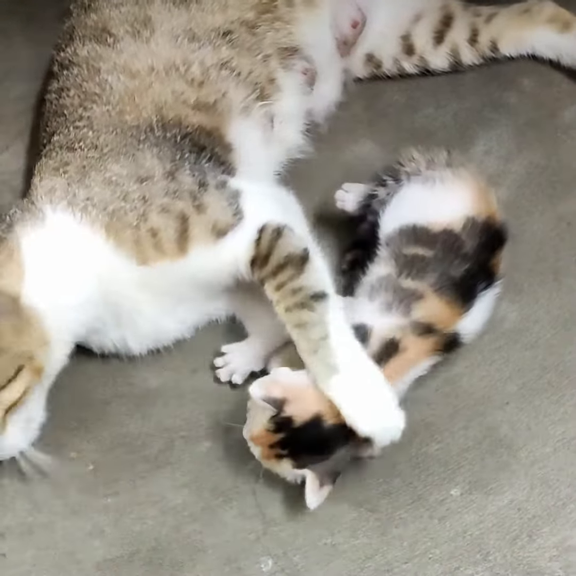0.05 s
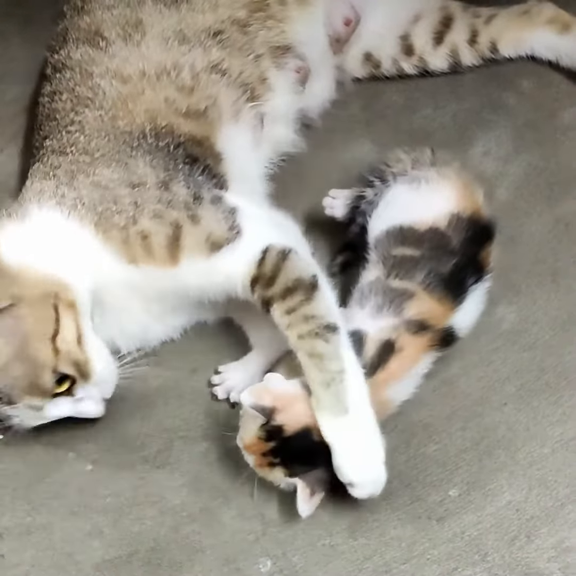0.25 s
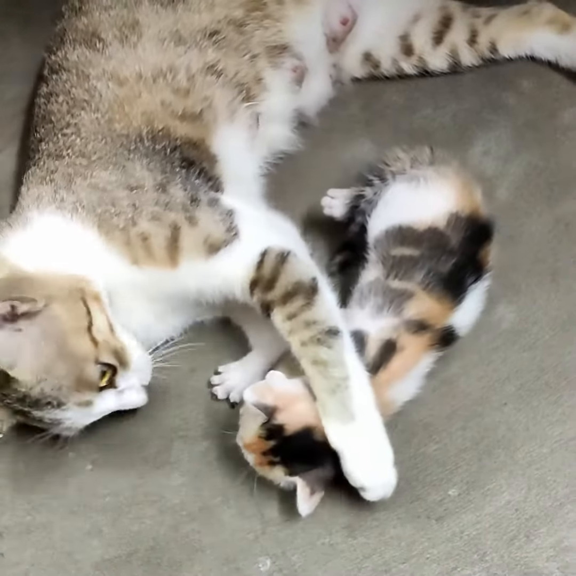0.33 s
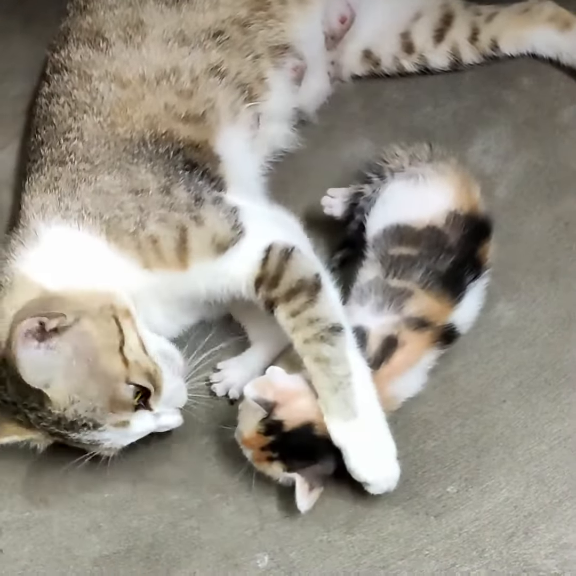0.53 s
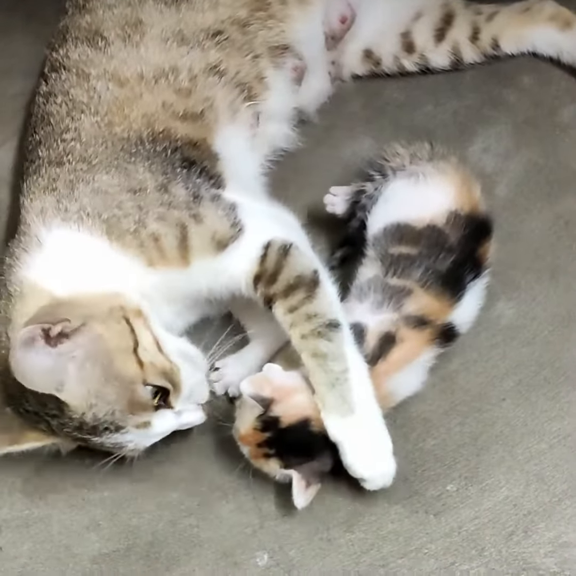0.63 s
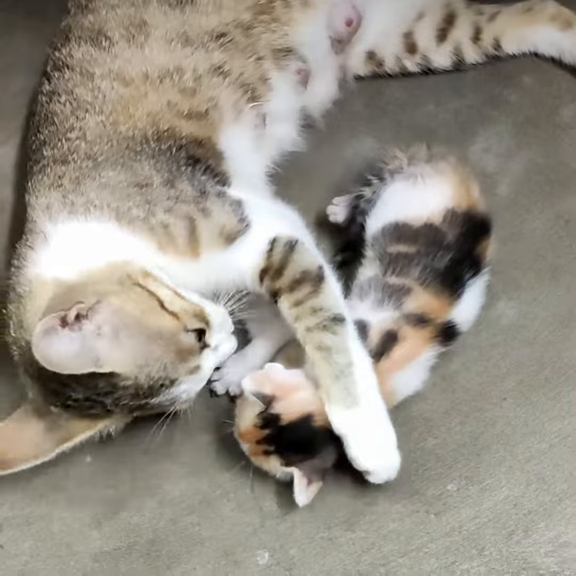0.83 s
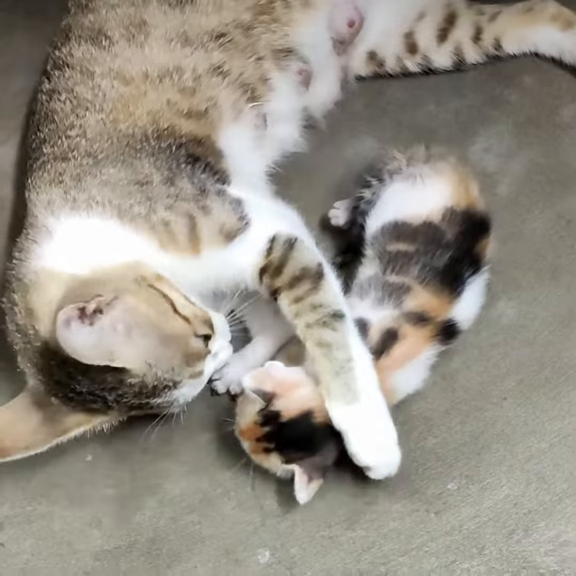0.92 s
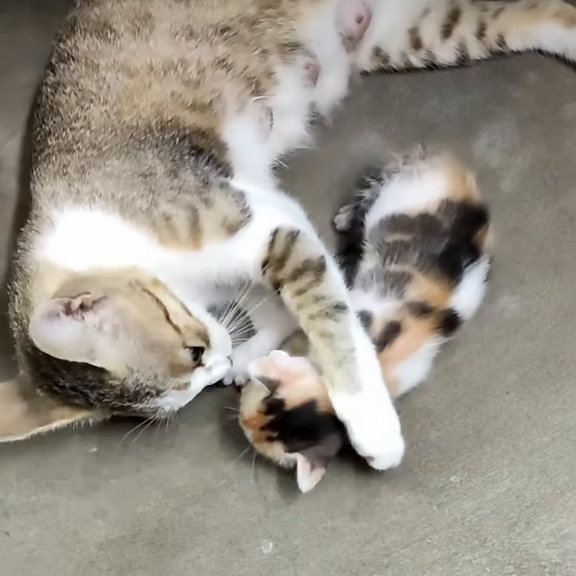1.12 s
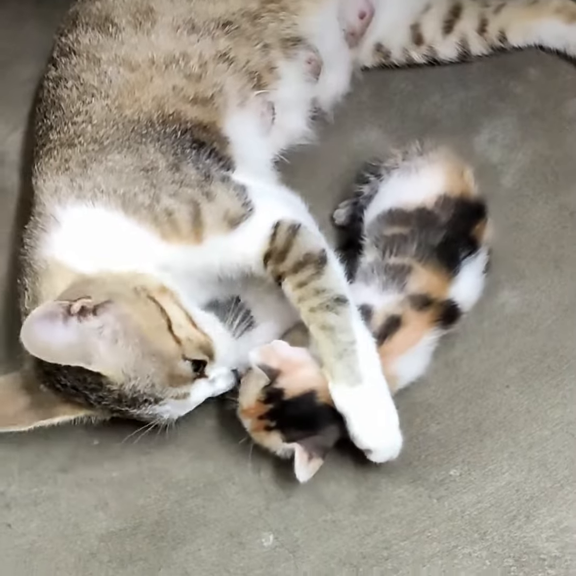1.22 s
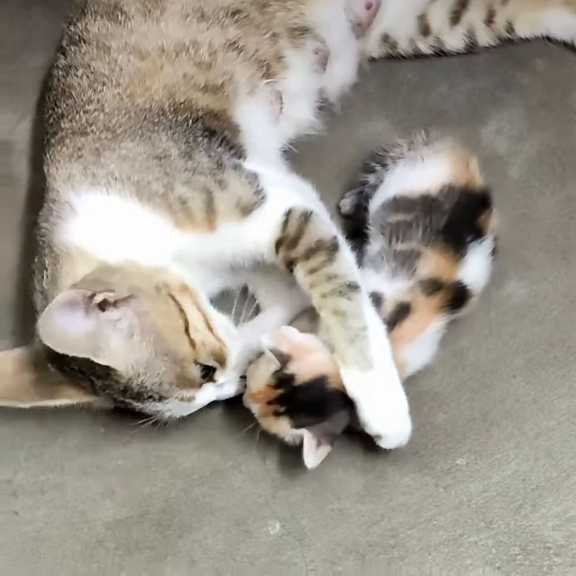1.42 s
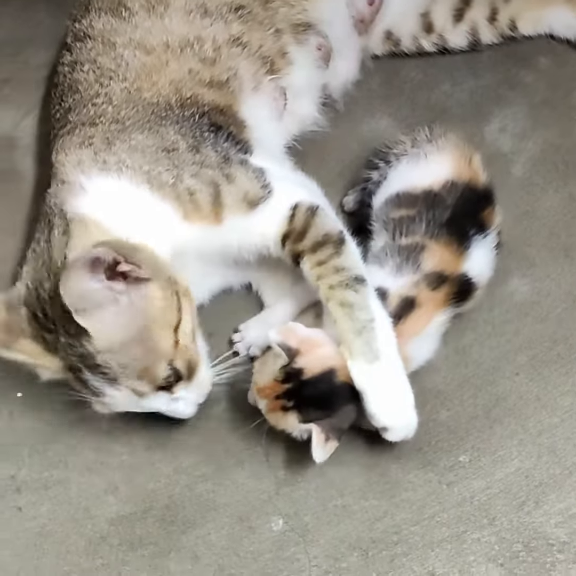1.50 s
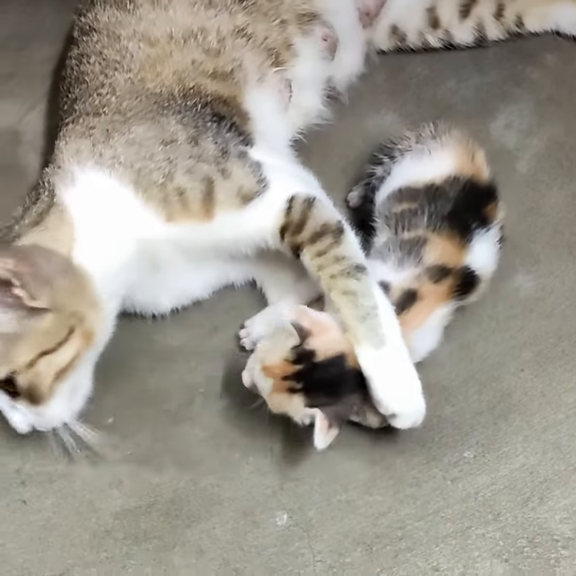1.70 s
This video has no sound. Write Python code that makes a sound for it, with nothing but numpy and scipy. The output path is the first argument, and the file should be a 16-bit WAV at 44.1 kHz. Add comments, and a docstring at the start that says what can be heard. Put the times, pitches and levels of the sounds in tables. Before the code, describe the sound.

One short cat meow starts as a fluttering closed-mouth trill, flares open, and falls away.

```python
"""A mother cat gives one trilled meow close to a phone: a closed-mouth trill, a clear hum, then the lips part,
the call flares bright and sinks again. She is a stack of partials, cut by throat flaps, with pulsing breath noise.
Her kitten mews faintly under the trill on four partials; a smack and one soft scuff are bursts of coloured noise.
A hard-walled shelter answers with a decaying noise tail; steady air noise and two low drones fill the quiet."""
import sys
import numpy as np
from scipy import signal
from scipy.fft import rfft, irfft, next_fast_len
from scipy.io import wavfile
from scipy.ndimage import uniform_filter1d, map_coordinates

SR = 44100
rng = np.random.default_rng(int(sys.argv[2]) if len(sys.argv) > 2 else 0)


def to_wav(s):
    """Save 16-bit WAV."""
    ch = np.atleast_2d(s).T  # columns
    pcm = np.round(np.clip(ch, -1, 1) * 32767)  # PCM
    wavfile.write(sys.argv[1], SR, pcm.astype(np.int16))


N = 77175
T = np.arange(N) / SR  # s


def amp(db):
    """dB to gain."""
    return 10 ** (np.asarray(db) / 20)


def unit(x):
    """Scale to rms 1."""
    return x / np.sqrt(np.mean(x ** 2) + 1e-20)


def along(points, hz):
    """Read a (Hz, value) curve on a log frequency axis."""
    f, v = np.transpose(points)
    return np.interp(np.log(hz + 1), np.log(f + 1), v)


def curves(rows):
    """Draw one automation curve, a value per sample, for each column after the time."""
    s, *columns = np.transpose(rows)
    return [np.interp(T, s, column) for column in columns]


def wobble(rate):
    """A smooth random curve, rate knots a second."""
    knots = rng.standard_normal(int(N * rate / SR) + 4)
    return map_coordinates(knots, [T * rate])


def filtered(x, response):
    """Filter x by a complex response of frequency."""
    m = next_fast_len(N + SR // 2)
    hz = np.fft.rfftfreq(m, 1 / SR)
    return irfft(rfft(x, m) * response(hz), m)[..., :N]


def hiss(tone):
    """Noise coloured by a (Hz, dB) curve, at rms 1."""
    return unit(filtered(rng.standard_normal(N), lambda hz: amp(along(tone, hz))))


def step(t, width):
    """A soft switch from 0 to 1 around t = 0."""
    return .5 + .5 * np.tanh(t / width / 2)


# throat flaps of the trill: t/s, depth (0-1), length/s
THROAT_FLAPS = [(.122, .9, .011), (.143, .7, .006), (.157, .8, .009), (.181, 1, .024), (.224, 1, .018),
                (.252, 1, .015), (.278, .7, .011), (.299, 1, .017), (.325, 1, .015), (.350, 1, .014),
                (.374, .4, .006), (.813, .8, .005), (.826, 1, .01)]
CLOSE_S, OPEN_S = .001, .001  # softness of each flap's edges
RETUNE = 1.15  # the pitch is back after this many flap lengths


def throat_flaps():
    """Each flap shuts for its length; the slack it leaves jumps up, then fades in a straight line."""
    shut, slack = 0, 0
    for s, depth, length in THROAT_FLAPS:
        closing = depth * step(T - s, CLOSE_S)
        shut = shut + closing * step(s + length - T, OPEN_S)
        slack = slack + closing * np.clip(1 - (T - s) / (RETUNE * length), 0, 1)
    return shut, slack


# partials before flaps and shimmer: t/s, fundamental level/dB, second partial level/dB,
# overtones through the nose level/dB, overtones through the open mouth level/dB
CALL_LEVELS = [(.085, -80, -64.5, -71, -90), (.105, -43, -56, -62.5, -90), (.14, -48, -49.5, -53.5, -90),
               (.17, -45.5, -47, -50.5, -88), (.2, -45.5, -43.5, -51, -93),
               (.218, -39.5, -42, -44.5, -93.5), (.247, -48, -38, -47.5, -92),
               (.272, -43, -43.5, -42.5, -84.5), (.295, -44.5, -39, -43.5, -87),
               (.32, -42.5, -36.5, -46, -88.5), (.347, -45, -35, -47.5, -91),
               (.368, -43, -34.5, -48.5, -96.5), (0.38, -41.5, -34.5, -42.5, -71),
               (0.402, -39.5, -28.5, -53, -63.5), (0.464, -35.5, -29.5, -46.5, -53),
               (0.478, -52, -27, -48, -54), (0.496, -46, -39.5, -63.5, -60), (0.51, -50, -47.5, -55.5, -86),
               (0.52, -45, -49, -61.5, -47.5), (0.538, -57.5, -51, -49.5, -53),
               (0.556, -46, -52.5, -40.5, -43.5), (0.576, -43, -30, -46, -23),
               (0.592, -42, -35.5, -50, -21.5), (0.602, -47, -33.5, -57, -35),
               (0.614, -45, -40.5, -38.5, -32.5), (0.634, -57, -42, -48.5, -51),
               (0.646, -49, -61.5, -49, -50), (0.662, -40.5, -38.5, -50, -46.5),
               (0.672, -43.5, -39, -50, -61), (0.724, -40.5, -36.5, -57, -56),
               (0.756, -41.5, -38.5, -62, -63.5), (0.782, -44.5, -45.5, -74, -78),
               (0.788, -48, -39.5, -62, -73.5), (0.808, -40, -51, -56, -76),
               (0.818, -42.5, -44.5, -57, -83), (0.83, -49, -48.5, -65, -70), (.838, -68, -57, -71, -95),
               (.858, -63.5, -57, -67, -84), (.87, -52, -66, -73, -83), (.88, -63, -72, -75, -90.5)]
# colour of the overtones through the nose: f/Hz, level/dB
NOSE_TONE = [(1000, 17), (1350, -6), (1800, -0.5), (2150, -12.5), (2600, -27), (3200, -22.5), (4400, -20.5),
             (5000, -24), (6000, -48), (9000, -71.5)]
# colour of the overtones through the open mouth: f/Hz, level/dB
MOUTH_TONE = [(1500, -27.5), (1830, -18.5), (2400, -8), (3060, -7), (3700, -11), (4300, -20.5), (5000, -39),
              (6100, -38.5), (6900, -35), (7600, -45.5), (8600, -57), (12000, -78)]
FLAP_CUT_DB, FLAP_UPPER_CUT_DB = 13, 16  # cut on the fundamental, on the partials above
SHIMMER_DB = .5  # random level wobble of the fundamental, wider for higher partials


def voice(hz, phase, shut, slack):
    """Fifteen partials: two set directly, the rest coloured by nose and mouth as they slide in pitch."""
    first_db, second_db, nose_db, mouth_db = curves(CALL_LEVELS)
    upper_cut = amp(-FLAP_UPPER_CUT_DB * shut)
    gains = [amp(first_db - FLAP_CUT_DB * slack ** 2), amp(second_db) * upper_cut]
    for k in range(3, 16):
        nose = amp(nose_db + along(NOSE_TONE, k * hz))
        mouth = amp(mouth_db + along(MOUTH_TONE, k * hz))
        gains.append(upper_cut * np.hypot(nose, mouth))
    partials = 0
    for k, gain in enumerate(gains, 1):
        shimmer = amp(SHIMMER_DB * np.sqrt(k) * wobble(70))
        # the lowest two partials stay in step; the others start anywhere
        start = np.clip(k - 2, 0, 1) * rng.uniform(0, 2 * np.pi)
        partials = partials - np.sqrt(2) * gain * shimmer * np.cos(k * phase + start)
    return partials


# colour of the breath under the voice: f/Hz, level/dB
BREATH_TONE = [(250, -31.5), (420, -16.5), (600, -19.5), (950, -1.5), (1250, -6.5), (1850, -12.5),
               (2300, -29.5), (4500, -20), (6000, -56.5), (9000, -60)]
# rasp of air in the open mouth, before it pulses: t/s, level/dB
RASP_LEVEL = [(.515, -85), (.527, -57), (.56, -61), (.585, -56), (.615, -52), (.65, -58), (.7, -63),
              (.77, -76)]
# colour of the rasp: f/Hz, level/dB
RASP_COLOUR = [(1200, -22), (2200, -9.5), (3000, -4), (3700, -7.5), (4400, -10.5), (5200, -10),
               (6000, -18.5), (7100, -8), (7700, -22), (9000, -40)]
BREATH_DB, TRILL_BREATH_DB, TRILL_END_S = -26, -14.5, .38  # breath levels relative to the lowest two partials


def breath_and_rasp(phase):
    """Air noise follows the voice level, rasp its own curve; both swell and thin with every voice cycle."""
    first_db, second_db, _, _ = curves(CALL_LEVELS)
    rasp_db, = curves(RASP_LEVEL)
    breath_db = np.where(T < TRILL_END_S, TRILL_BREATH_DB, BREATH_DB)
    breath_gain = uniform_filter1d(amp(breath_db), size=900)  # soft change at the trill's end
    breath = np.hypot(amp(first_db), amp(second_db)) * breath_gain * hiss(BREATH_TONE)
    rasp = amp(rasp_db) * hiss(RASP_COLOUR)
    return (breath + rasp) * (1 + 0.89 * np.cos(phase))


# the mother's pitch before sag and jitter: t/s, f/Hz
CALL_PITCH = [(.085, 435), (.17, 450.4), (.215, 460.6), (.3, 459.5), (.345, 469.6), (.378, 471.1),
              (.405, 505.1), (.468, 540), (.5, 534), (.52, 550.8), (.535, 576.5), (.556, 578),
              (.576, 613.1), (.6, 610), (.64, 582.2), (.686, 552.8), (.712, 548.6), (.76, 526.3),
              (.794, 494.7), (.81, 483.7), (.83, 438.5), (.89, 443)]
FLAP_SAG, JITTER, FLAP_JITTER = .3, .002, .03  # fractions of the pitch at full depth


def mother():
    """Flaps cut the voice and let its pitch sag; breath rides on the cycles."""
    pitch, = curves(CALL_PITCH)
    shut, slack = throat_flaps()
    jitter = (JITTER + FLAP_JITTER * shut) * wobble(250)
    hz = pitch * (1 - FLAP_SAG * slack + jitter)
    phase = 2 * np.pi * np.cumsum(hz) / SR
    call = voice(hz, phase, shut, slack) + breath_and_rasp(phase)
    start, end = CALL_LEVELS[0][0], CALL_LEVELS[-1][0]
    return call * (T > start) * np.clip((end - T) / .02, 0, 1)


# the kitten's mew before its wobble: t/s, f/Hz, level/dB
MEW_CURVE = [(.11, 1200, -78), (.13, 1190, -54.5), (.17, 1200, -53.5), (.21, 1235, -51), (.26, 1260, -58),
             (.31, 1250, -55.5), (.35, 1230, -79.5)]
# its partials from the fundamental up, before their wobble: level/dB
MEW_PARTIALS = [0, -9, -12, -25]


def kitten():
    """A thin high mew: four sine partials, each wavering in level over a shared wavering pitch."""
    hz, level_db = curves(MEW_CURVE)
    phase = 2 * np.pi * np.cumsum(hz * (1 + 0.0069 * wobble(60))) / SR
    mew = 0
    for k, db in enumerate(MEW_PARTIALS, 1):
        mew = mew + amp(db + 1.9 * wobble(50)) * np.sin(k * phase)
    return np.sqrt(2) * amp(level_db) * mew * (T > MEW_CURVE[0][0]) * (T < MEW_CURVE[-1][0])


def puff(event, tone, attack):
    """A burst of coloured noise: rounded attack (s), exponential decay."""
    s, db, t60 = event
    t = np.clip(T - s, 0, None)
    return amp(db - 60 * t / t60) * (1 - np.exp(-t / attack)) * hiss(tone)


# the smack, level before its attack: t/s, level/dB, t60/s
SMACK_EVENT = (.519, -46, .03)
# its colour: f/Hz, level/dB
SMACK_COLOUR = [(400, -20), (900, -5), (1500, -6), (2200, -10), (3200, -1), (5000, -3), (6200, -14),
                (8500, -32), (13500, -26), (15500, -26)]


def smack():
    """A sharp, very short noise burst as the call brightens."""
    return puff(SMACK_EVENT, SMACK_COLOUR, attack=0.0004)


# the soft scuff, level before its attack: t/s, level/dB, t60/s
SCUFF_EVENT = (1.175, -57, .4)
# its colour: f/Hz, level/dB
SCUFF_COLOUR = [(800, -14), (2000, -1), (4000, -0.5), (5500, -7.5), (6800, -3), (7600, -25), (12000, -39.5)]


def scuff():
    """A softer, longer noise burst after the call."""
    return puff(SCUFF_EVENT, SCUFF_COLOUR, attack=0.0026)


# level balance of the near sources: f/Hz, left over right level/dB
PORT_LEAN = [(400, 2), (550, 2.5), (950, 4.5), (1100, .6), (1250, 0.5), (1800, -0.5), (2450, -0.1),
             (3060, 11.5), (3700, 2.5), (5000, 7.5), (9000, 9)]
# phase between the ports: f/Hz, left leads/rad
PORT_LEAD = [(300, -0.8), (430, 0.86), (550, -0.53), (1000, -0.74), (1200, -1.32), (1800, -1.15),
             (2450, -0.9), (3700, -1.5), (8000, -1.5)]


def ports(x):
    """A near source reaches the two microphone ports unequally: half the difference goes to each."""
    def half(hz):
        return amp(along(PORT_LEAN, hz) / 2) * np.exp(.5j * along(PORT_LEAD, hz))
    return filtered(x, lambda hz: np.array([half(hz), 1 / half(hz)]))


# likeness of the two ports, for walls and air: f/Hz, likeness (-1 to 1)
PORT_LIKENESS = [(60, 0.97), (130, 0.95), (290, 0.77), (640, 0.3), (1410, -0.0026), (3100, -0.03),
                 (6820, 0.13), (15000, -0.17)]
# decay of the shelter: f/Hz, t60/s
WALL_DECAY = [(300, .3), (1200, 0.42), (3000, 0.27), (8000, 0.11)]
# colour of the shelter's answer: f/Hz, level/dB
WALL_TONE = [(300, -16), (1050, -19), (1250, -12), (2500, -9), (8000, -9)]


def walls(x):
    """Convolve with a stereo noise tail in which each frequency dies at its own speed."""
    hz, t, z = signal.stft(rng.standard_normal((2, SR // 2)), SR, nperseg=256)
    shared = np.clip(along(PORT_LIKENESS, hz), 0, 1)[:, None] * 2 * z.mean(0)
    decay = amp(-60 * t / along(WALL_DECAY, hz)[:, None])
    tail = signal.istft((z + shared) * decay, SR, nperseg=256)[1]
    tail = tail / np.linalg.norm(tail, axis=1)[:, None]
    late = np.pad(x, (250, 0))[None]  # pre-delay in samples
    answer = signal.fftconvolve(late, tail, axes=1)[:, :N]
    return filtered(answer, lambda hz: amp(along(WALL_TONE, hz)))


# colour of the air noise: f/Hz, relative level/dB
AIR_TONE = [(20, 1), (48, -10), (86, -3.5), (107, -13.5), (156, -5), (228, -9), (295, -5), (484, -3),
            (743, -6.5), (1200, -8), (2500, -15.5), (6900, -25.5), (7700, -31.5), (12000, -33.5),
            (15500, -38.5)]
# its stereo balance: f/Hz, left over right level/dB
AIR_LEAN = [(60, 0), (180, 2), (550, -1.5), (1650, 4.5), (4970, 2.5), (15000, -0.5)]
AIR_DB = -54.5  # rms over both channels


def air():
    """Far steady noise with slight random flicker, alike at both ports in the bass."""
    z = signal.stft(rng.standard_normal((2, N)), nperseg=512)[2]
    flicker = uniform_filter1d(rng.standard_normal(z.shape[1:]), size=6, axis=0)
    flicker = uniform_filter1d(flicker, size=12, axis=1)
    pair = signal.istft(z * amp(1.16 * unit(flicker)), nperseg=512)[1][:, :N]

    def mid_side(hz):
        turn = np.arccos(np.clip(along(PORT_LIKENESS, hz), -1, 1)) / 2
        return amp(along(AIR_TONE, hz)) * [np.cos(turn), np.sin(turn)]
    mid, side = filtered(pair, mid_side)
    both = np.array([mid + side, mid - side])
    both = filtered(both, lambda hz: amp(np.outer([.5, -.5], along(AIR_LEAN, hz))))
    return amp(AIR_DB) * unit(both)


# wavering low drones: f/Hz, width/Hz, level/dB
DRONE_BANDS = [(82, 15.7, -68), (165.3, 27, -71)]


def drones():
    """Narrow bands of noise waver by themselves, the same in both channels."""
    total = 0
    for centre, width, db in DRONE_BANDS:
        band = filtered(rng.standard_normal(N), lambda hz: np.exp(-((hz - centre) / width) ** 2))
        total = total + amp(db) * unit(band)
    return total


def scene():
    """Near sounds through the ports and the walls, over the air and drones."""
    near = mother() + kitten() + smack() + scuff()
    return ports(near) + walls(near) + air() + drones()


def record(dry):
    """The phone keeps nothing above its band limit."""
    return filtered(dry, lambda hz: hz < 15720)


dry = scene()
out = record(dry)
to_wav(out)
```